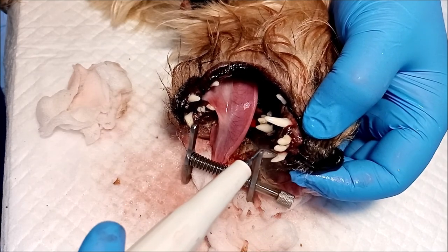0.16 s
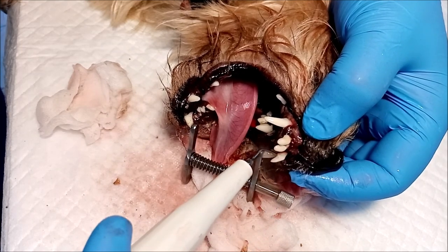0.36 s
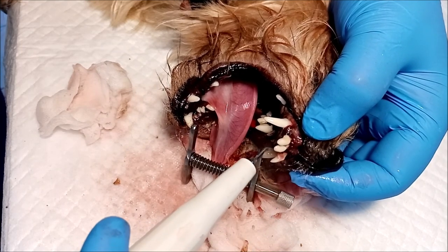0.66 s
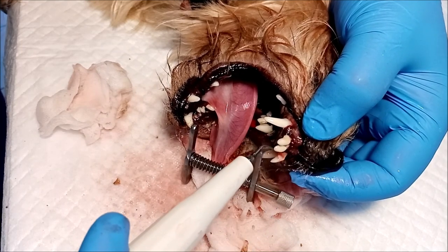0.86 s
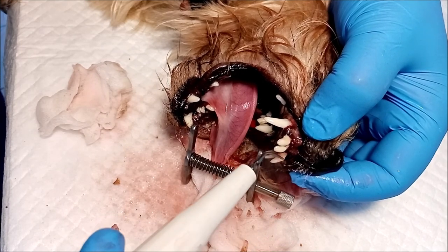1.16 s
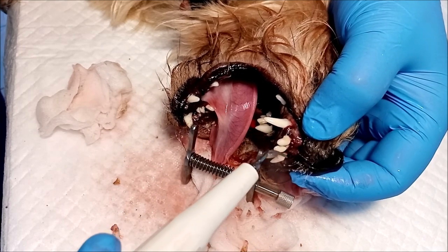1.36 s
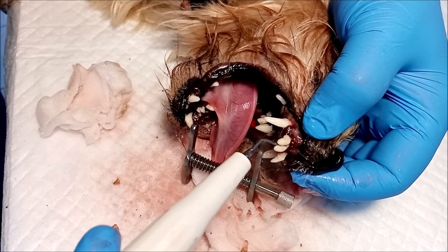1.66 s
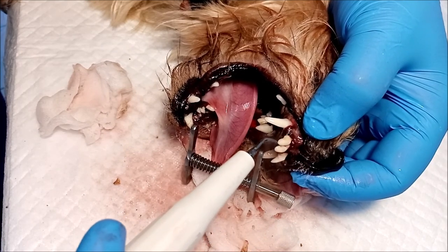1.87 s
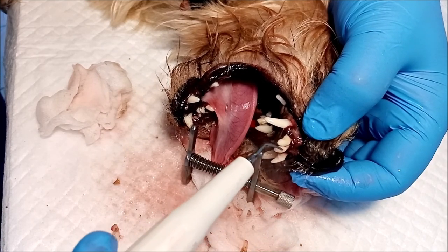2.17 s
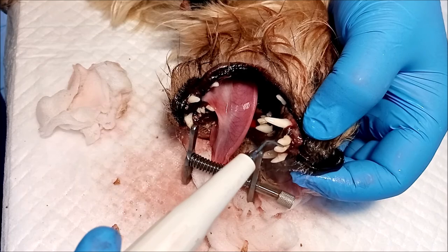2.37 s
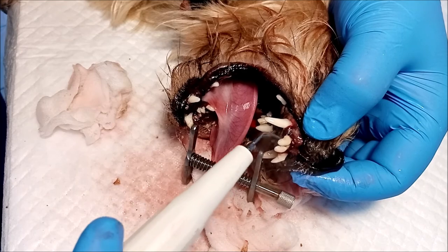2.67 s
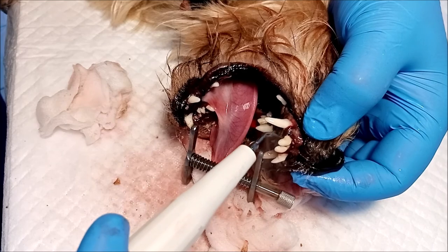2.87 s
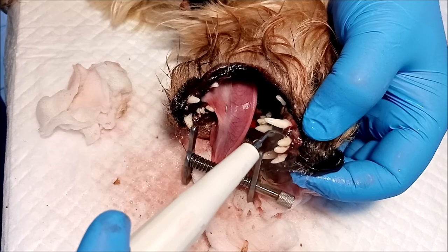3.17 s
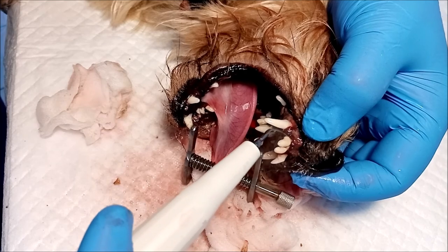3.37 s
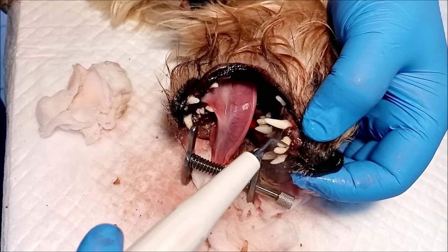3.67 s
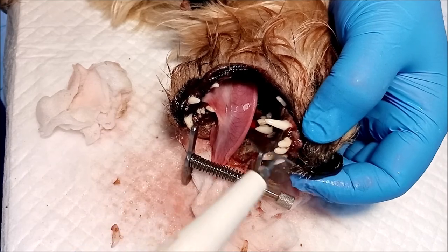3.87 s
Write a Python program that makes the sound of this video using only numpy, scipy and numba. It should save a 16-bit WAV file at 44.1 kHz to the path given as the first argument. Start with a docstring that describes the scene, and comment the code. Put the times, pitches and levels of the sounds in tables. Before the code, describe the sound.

A dental scaler squeals thin and rough near 8 kHz in uneven touches over scratchy crackle and water hiss, then stops suddenly with soft thuds and a puff.

```python
"""A rough squeal near 8 kHz over a scratchy hiss: an ultrasonic scaler works along wet teeth by two microphone ports.
The tip bounces unevenly on the enamel; its clustered impacts excite moving and fixed resonances.
Strong ultrasound overdrives each port on its own, heard as low crackle and lone pops.
Water spray hisses below as shaped noise; switching off gives soft thuds, a bright puff and a short hollow ring."""
import sys
import numpy as np
from scipy import signal
from scipy.fft import rfft, irfft, next_fast_len
from scipy.io import wavfile
from numba import njit

SR = 44100
rng = np.random.default_rng(int(sys.argv[2]) if len(sys.argv) > 2 else 0)


def inscribe(sig):
    """Save sig as 16-bit PCM at rate SR to the path in sys.argv[1].

    A 1-D sig is mono; a 2-D sig holds one channel per row.
    Samples are clipped to [-1, 1] before scaling.
    """
    pcm = np.round(np.clip(np.atleast_2d(sig).T, -1, 1) * 32767)
    wavfile.write(sys.argv[1], SR, pcm.astype(np.int16))


def boost_factor(decibels):
    """Convert a level in decibels to a linear amplitude factor."""
    exponent = np.asarray(decibels, float) / 20
    return 10 ** exponent


N = 177634
OFF_S = 3.865           # the tip has stopped
CONTROL_STEP = 32       # samples between values of a slow level curve


def rms_one(x):
    """Normalisation: each channel is scaled to unit effective value."""
    return x / np.sqrt(np.mean(x ** 2, axis=-1, keepdims=True) + 1e-20)


def in_time(rows):
    """Linear interpolation: each column of a table becomes a curve over time."""
    s, *columns = np.transpose(rows)
    return [np.interp(np.arange(N) / SR, s, c) for c in columns]


def colour(x, points):
    """Spectral weighting: dB curves over log frequency shape each channel; the mean power becomes 1."""
    hz, *columns = np.transpose(points)
    size = next_fast_len(N)
    log_hz = np.log(np.arange(size // 2 + 1) * SR / size + 1)
    gains = boost_factor([np.interp(log_hz, np.log(hz), c) for c in columns])
    out = irfft(rfft(x, size) * gains, size)[..., :N]
    return out / np.sqrt(np.mean(out ** 2))


def drift(rate, channels=1):
    """Low-pass random process: noise twice through a one-pole filter at rate [Hz], spread 1."""
    r = np.exp(-2 * np.pi * rate / SR)
    noise = rng.standard_normal((channels, N + 4000))
    slow = signal.lfilter([1], [1, -2 * r, r * r], noise)
    return rms_one(slow[:, 4000:])      # the filter's start is left out


def grains(per_s, spread_db, channels):
    """Shot noise: random clicks of either sign, their strengths in dB spread exponentially up to a limit."""
    strength_db = spread_db * np.minimum(rng.exponential(1, (channels, N)), 3)
    sizes = boost_factor(strength_db) * rng.choice([-1, 1], (channels, N))
    present = rng.random((channels, N)) < per_s / SR
    return rms_one(sizes * present + 1e-9)


def patchy(x, patchy_db, rate):
    """Independent band modulation: overlapping two-thirds-octave bands swell and sink, each by itself."""
    size = next_fast_len(N)
    octaves = np.log2(np.arange(size // 2 + 1) * SR / size / 100 + 1e-9).clip(0, 7)     # above 100 Hz
    band = octaves * 3 / 2
    spectrum = rfft(x, size)
    swell = boost_factor(patchy_db * drift(rate, channels=11))
    out = 0
    for k in range(11):
        weight = np.clip(1 - abs(band - k), 0, 1)
        out = out + swell[k] * irfft(spectrum * weight, size)[..., :N]
    return out


@njit
def resonate(x, turn, r):
    """Second-order resonance: its centre (radians per sample) may move; gain 1 on top."""
    y = np.zeros(len(x))
    for i in range(2, len(x)):
        y[i] = (1 - r * r) / 2 * (x[i] - x[i - 2]) + 2 * r * np.cos(turn[i]) * y[i - 1] - r * r * y[i - 2]
    return y


def mode(x, hz, width_hz):
    """Cascaded resonance: two equal stages, each width_hz wide, make steep skirts; rms 1."""
    turn, r = 2 * np.pi * hz / SR * np.ones(N), np.exp(-np.pi * width_hz / SR)
    return rms_one(resonate(resonate(x, turn, r), turn, r))


def at_ports(shared, own, alike):
    """Partial coherence: the right port gets the shared part later; each port adds a part of its own."""
    lag, alike = round(0.00077 * SR), np.clip(alike, 0, 1)      # lag of 0.77 ms
    common = np.array([shared, np.roll(shared, lag)])
    return np.sqrt(alike) * common + np.sqrt(1 - alike) * own


def split(level_db, pan_db):
    """Addition of incoherent powers: gains of two unrelated channels whose average has the given level."""
    left_share = 1 / (1 + boost_factor(-2 * pan_db))
    return 2 * boost_factor(level_db) * np.sqrt([left_share, 1 - left_share])


def held(rows, attack_s, release_s):
    """Exponential build-up and decay: power of each event, full from start to end; times are of amplitude."""
    t = np.arange(0, N + CONTROL_STEP, CONTROL_STEP) / SR
    start, length = np.transpose(rows)[:2, :, None]
    before, after = np.maximum(start - t, 0), np.maximum(t - start - length, 0)
    return np.exp(-2 * before / attack_s - 2 * after / release_s)


def every_sample(coarse):
    """Linear interpolation: a slow level curve is read at every sample."""
    return np.interp(np.arange(N) / CONTROL_STEP, np.arange(len(coarse)), coarse)


# spray colour at the ports: (frequency [Hz], left density [dB per Hz], right density [dB per Hz]), relative
SPRAY_COLOUR = [(39.5, 5.5, -32), (173, 5, 4), (1150, -3.5, -8.5), (2580, -5, -9), (4700, -2.5, -1.5),
                (6800, -9, -5), (8200, -3, 3.5), (9600, -16, -4.5), (12100, -5.5, -2.5), (13600, -9, -0.5),
                (15400, -4.5, -13)]
# spray flow before the fixed gains: (time [s], hiss level [dB], level of the rumble under 900 Hz [dB])
SPRAY_FLOW = [(0, -61.5, -65), (1, -61.5, -67), (2, -64, -80), (3, -60, -74), (3.88, -62, -63.5),
              (3.925, -64.5, -76), (3.965, -69, -88), (3.985, -72.5, -69), (4.03, -80, -65)]


def spray():
    """Turbulent flow noise: cooling water hisses as broadband noise; its rumble sinks first."""
    hiss_db, rumble_db = in_time(SPRAY_FLOW)
    noise = patchy(colour(rng.standard_normal((2, N)), SPRAY_COLOUR), patchy_db=3.0, rate=4.5)
    hiss = signal.sosfiltfilt(signal.butter(3, 900, "high", fs=SR, output="sos"), noise)
    rumble = signal.sosfiltfilt(signal.butter(3, 900, "low", fs=SR, output="sos"), noise)
    return boost_factor(hiss_db + 4.5) * hiss + boost_factor(rumble_db + 3.5) * rumble


# soft thuds of switching off: (time [s], level before shape and side gains [dB], frequency [Hz])
SWITCH_THUDS = [(3.826, -57, 170), (3.872, -54, 111), (3.894, -49.5, 174)]


def switch_off():
    """Damped oscillation and decaying noise: thuds of about one cycle, then a valve puff and its hollow ring."""
    puff_s, rise_s = 3.907, 0.0026
    puff_db, puff_t60_s = -46.5, 0.15
    ring_hz, ring_width_hz, ring_db, ring_t60_s = 1172, 800, -61, .5
    t, out = np.arange(N) / SR, np.zeros((2, N))
    for s, db, hz in SWITCH_THUDS:
        cycles = np.maximum(t - s, 0) * hz
        thud = 2.0 * np.sin(2 * np.pi * cycles) * np.exp(-1.8 * cycles)
        out += boost_factor(db) * thud * boost_factor([[3.0], [-4.0]])     # left, right
    since = np.maximum(t - puff_s, 0)
    rise = 1 - np.exp(-since / rise_s)
    noise = rng.standard_normal((2, N))
    bright = rms_one(signal.sosfilt(signal.butter(2, 6000, "high", fs=SR, output="sos"), noise))
    hollow = np.array([mode(mode(n, ring_hz, ring_width_hz), ring_hz, ring_width_hz) for n in noise])
    puff = boost_factor(puff_db - 60 * since / puff_t60_s) * bright
    ring = boost_factor(ring_db - 60 * since / ring_t60_s) * hollow
    return out + rise * (puff + ring)


# bursts of overdrive: (start [s], length [s], crackle level [dB], left-right balance [dB])
OVERDRIVE_BURSTS = [(0, 0.0045, -51, 23), (0.079, 0.071, -58, 18), (0.194, 0.023, -50, 27),
                    (0.332, 0.029, -51, 37), (0.436, 0.037, -46.5, 16), (0.487, 0.014, -48.5, 23),
                    (0.512, 0.042, -69, 18), (0.624, 0.03, -60, 27), (0.767, 0.017, -56.5, 28),
                    (1.038, 0.026, -52, 20), (1.211, 0.05, -50.5, 41), (1.599, 0.033, -55, 15),
                    (1.702, 0.03, -63.5, 2), (1.887, 0.094, -49, 13), (1.992, 0.078, -47, 20),
                    (2.098, 0.014, -54, 18), (2.213, 0.0096, -57, 6), (2.389, 0.13, -48, 20),
                    (2.632, 0.029, -54, 16), (2.717, 0.07, -58.5, 2), (2.843, 0.11, -52, 5.5),
                    (2.988, 0.025, -56.5, 9), (3.125, 0.052, -49.5, 21), (3.318, 0.028, -55, 25),
                    (3.377, 0.053, -55.5, 5.5), (3.448, 0.03, -45, 22), (3.647, 0.011, -58, 18),
                    (3.75, 0.052, -57, 15)]
# faint crackle under the bursts: (time [s], level [dB], left-right balance [dB])
FAINT_BED = [(0, -76, 10), (.3, -67.5, 15), (.6, -57.5, 27), (.85, -70.5, 0), (1.15, -63.5, 28),
             (1.5, -65, -13), (1.8, -66, -6.5), (2.2, -64.5, 5), (2.6, -63.5, 10), (2.8, -57.5, -11.5),
             (3.25, -64, 21), (3.55, -61, 28), (3.85, -68, 18)]


def overdrive():
    """Addition of powers: level and left-right balance in dB of crackle bursts over a faint bed."""
    _, _, burst_db, burst_pan = np.transpose(OVERDRIVE_BURSTS)[:, :, None]
    faint_db, faint_pan = in_time(FAINT_BED)
    bursts = boost_factor(2 * burst_db) * held(OVERDRIVE_BURSTS, attack_s=0.0084, release_s=0.0085)
    faint = boost_factor(2 * faint_db)
    power = every_sample(bursts.sum(axis=0)) + faint
    pan_db = (every_sample((bursts * burst_pan).sum(axis=0)) + faint * faint_pan) / power
    return 10 * np.log10(power), pan_db


# crackle colour at the ports: (frequency [Hz], left density [dB per Hz], right density [dB per Hz]), relative
CRACKLE_COLOUR = [(30, -24, -32), (60.5, -10, -22), (118, -1.5, 2), (197, -0.5, -3), (596, -2.5, -0.5),
                  (1650, -8.5, -1.5), (2880, -13, -4.5), (6800, -15, -8), (10400, -18, -18),
                  (15200, -31, -43)]
# weight of the crackle's bass: (time [s], gain [dB])
BASS_WEIGHT = [(0, 0), (1, 5), (2, 4), (2.5, 1.5), (3.0, -3), (3.8, -2.5)]


def crackle(clumps, level_db, pan_db):
    """Overload: each port pops by itself, partly in step with the impacts, until the tip stops."""
    bass_hz, stop_s = 201, 0.03
    running = np.clip((OFF_S - np.arange(N) / SR) / stop_s, 0, 1)
    pops = grains(3000, spread_db=4.5, channels=2) * clumps ** 0.24 * boost_factor(3.1 * drift(45, channels=2))
    pops = patchy(colour(rms_one(pops), CRACKLE_COLOUR), patchy_db=2.0, rate=17.0)
    bass = signal.sosfiltfilt(signal.butter(2, bass_hz, fs=SR, output="sos"), pops)
    weighted = pops + (boost_factor(in_time(BASS_WEIGHT)[0]) - 1) * bass
    return running * split(level_db, pan_db) * weighted


# lone pops at the left port: (time [s], starting level [dB], time scale [ms])
LEFT_POPS = [(.367, -34, 0.56), (1.938, -30, 0.84), (2.017, -38, 0.4), (2.099, -29.5, 1.03),
             (2.422, -34, 0.68), (2.493, -24.5, 0.23), (2.522, -29, 0.94)]


def lone_pops():
    """Step response of an overloaded port: the strongest overdrive jumps suddenly and swings back."""
    t, left = np.arange(N) / SR, np.zeros(N)
    for s, db, ms in LEFT_POPS:
        lengths = np.maximum(t - s, 0) * 1000 / ms
        left += boost_factor(db) * (t >= s) * np.cos(2.0 * lengths) * np.exp(-.7 * lengths)
    return np.array([left, 0 * left])


# touches of the tip on the tooth, levels while held:
# (start [s], length [s], squeal level [dB], squeal pitch [Hz], squeal left-right balance [dB], scratch level [dB])
TIP_TOUCHES = [(0.0, 0.037, -50, 8130, 6, -65.5), (0.058, 0.12, -51, 8100, 3.5, -55.5),
               (0.182, 0.054, -52.5, 8070, -3, -53.5), (0.257, 0.06, -60, 8500, -20, -62),
               (0.332, 0.042, -55, 8630, -7, -50), (0.397, 0.075, -52.5, 8870, -8, -55),
               (0.484, 0.013, -51, 8370, -3, -51.5), (0.588, 0.012, -61, 8500, -18, -62.5),
               (0.618, 0.047, -54.5, 8720, -2, -58), (0.691, 0.078, -63.5, 8850, -2, -57),
               (1.051, 0.027, -47, 8370, 2, -54), (1.213, 0.056, -55, 8500, -5, -54),
               (1.283, 0.026, -63, 8650, -15, -60.5), (1.441, 0.14, -47.5, 8600, 6.5, -57),
               (1.595, 0.042, -50.5, 8360, 3, -53), (1.655, 0.028, -59, 8200, -11, -79),
               (1.692, 0.064, -45, 8270, 8.5, -56), (1.765, 0.11, -48.5, 8300, 6, -56.5),
               (1.921, 0.047, -49, 8580, 3, -50.5), (1.994, 0.12, -50.5, 8450, 2.5, -55),
               (2.212, 0.0067, -57, 8250, 9, -53), (2.286, 0.051, -47, 7900, 9, -56),
               (2.354, 0.027, -47.5, 8220, 2, -55), (2.389, 0.15, -54, 8200, -1, -54.5),
               (2.548, 0.052, -60, 8000, -20, -68), (2.635, 0.028, -59, 8590, -14, -53.5),
               (2.686, 0.028, -49.5, 8560, 6, -55), (2.723, 0.073, -46, 8240, 4, -54.5),
               (2.81, 0.13, -52.5, 8180, -1, -53), (2.953, 0.023, -66, 8060, -4, -54),
               (2.982, 0.036, -51.5, 8550, -5, -53.5), (3.115, 0.064, -49.5, 8700, -5, -52),
               (3.188, 0.13, -54.5, 8520, -20, -59), (3.31, 0.038, -56.5, 8800, -22, -54.5),
               (3.367, 0.068, -59, 9300, -12, -61.5), (3.44, 0.052, -48.5, 8000, -2, -56),
               (3.496, 0.1, -56.5, 8750, -27, -58.5), (3.607, 0.069, -55, 9120, -25, -56.5),
               (3.699, 0.068, -55.5, 9010, -23, -60), (3.778, 0.013, -51, 8200, -11, -55.5)]


def touching():
    """Energy balance of contact: squeal, scratch and sizzle levels; the strongest touch rules pitch and side."""
    attack_s, release_s = .003, 0.01
    landing_db, landing_s = -4.5, 0.0075            # an extra burst on landing, against the held level
    # the wet film is felt a moment before landing and keeps a weak contact after lifting
    approach_s, linger_s, linger_db, scratch_linger_db = .012, 0.078, -17, -21.5
    linger_turn_db = -14                            # the lingering squeal leans further right
    free_squeal_db, free_squeal_hz, free_pan_db, free_scratch_db = -76, 8300, 8, -79    # the tip running free
    sizzle_from_squeal_db, sizzle_from_scratch_db = -11, -9.5

    _, _, squeal_db, hz, pan_db, scratch_db = np.transpose(TIP_TOUCHES)[:, :, None]
    film = held(TIP_TOUCHES, approach_s, linger_s)
    landings = held([(row[0], 0) for row in TIP_TOUCHES], attack_s, landing_s)
    firm = held(TIP_TOUCHES, attack_s, release_s) + boost_factor(2 * landing_db) * landings
    time_left = OFF_S - np.arange(len(firm[0])) * CONTROL_STEP / SR
    running = np.clip(time_left / 0.026, 1e-3, 1) ** 2

    ringing = boost_factor(2 * squeal_db) * firm
    lingering = boost_factor(2 * (squeal_db + linger_db)) * film
    free = boost_factor(2 * free_squeal_db)
    squealing = (ringing + lingering).sum(axis=0) + free
    # pitch and side are means weighted by power
    pitch = (((ringing + lingering) * hz).sum(axis=0) + free * free_squeal_hz) / squealing
    turned = ringing * pan_db + lingering * (pan_db + linger_turn_db)
    side = (turned.sum(axis=0) + free * free_pan_db) / squealing
    rasping = (boost_factor(2 * scratch_db) * (firm + boost_factor(2 * scratch_linger_db) * film)).sum(axis=0)
    rasping = rasping + boost_factor(2 * free_scratch_db)
    sizzling = boost_factor(2 * sizzle_from_squeal_db) * squealing + boost_factor(2 * sizzle_from_scratch_db) * rasping
    levels = [every_sample(10 * np.log10(p * running)) for p in (squealing, rasping, sizzling)]
    return levels + [every_sample(pitch), every_sample(side)]


def bouncing():
    """Impact excitation: tip impacts come in clumps a few ms long; rows: shared, left, right."""
    clumps = boost_factor(2.3 * drift(110))
    return clumps, clumps * grains(12000, spread_db=-1.0, channels=3)


# sizzle colour at the ports: (frequency [Hz], left density [dB per Hz], right density [dB per Hz]), relative
SIZZLE_COLOUR = [(8500, -51, -63), (9600, -15, 8.5), (12200, -4, 0.5), (12800, 3, 0.5), (14650, -1.5, 7),
                 (15200, -2, -3), (15900, -30, -13)]
# sizzle against its share of squeal and scratch: (time [s], gain [dB], left-right balance [dB])
SIZZLE_BALANCE = [(0, -0.5, 2), (.15, 2, 1), (.5, -0.5, 0.5), (.9, 5.5, 1), (1.3, -2, 1.5), (1.55, -1.5, 1),
                  (1.8, 3, -1), (2.1, 1.5, 1), (2.4, 0.5, 0.5), (2.9, -3.5, -1), (3.15, -1, -1),
                  (3.4, 0.5, 1.5), (3.7, 3.5, 3), (3.8, -6, 0)]


def sizzle(impacts, level_db, squeal_pan):
    """Broadband spectrum of short impacts: their sharpest edge, leaning partly with the squeal."""
    trim_db, trim_pan = in_time(SIZZLE_BALANCE)
    ports = at_ports(impacts[0], impacts[1:], alike=0.076)
    return split(level_db + trim_db, trim_pan + 0.71 * squeal_pan) * colour(ports, SIZZLE_COLOUR)


# scratch colour: (frequency [Hz], density [dB per Hz]), relative
SCRATCH_COLOUR = [(1500, -6.5), (2600, -3), (4000, 0.5), (5500, 1.5), (7000, -2), (9000, 1.5),
                  (11000, -22.5)]
# rough whistle in the scratch, before flutter:
# (time [s], pitch [Hz], level against the rasp [dB], left-right balance [dB])
ROUGH_WHISTLE = [(0, 4180, -9, -15), (.5, 4200, -12, -14), (.62, 4360, -4.5, 12), (1.08, 4350, -5.5, 3),
                 (1.27, 4130, -8, 10), (1.4, 4100, -25, -6), (1.95, 3560, -11, -6), (2.22, 3850, -8, -1),
                 (2.77, 4140, -8.5, -10), (2.86, 3420, -12.5, -6), (3.12, 3500, -9.5, -3),
                 (3.2, 4000, -2, 8), (3.26, 3240, 0, 23), (3.33, 4870, -14, 7), (3.52, 3950, -4, 3),
                 (3.6, 3480, -23, 16), (3.66, 4280, 0.5, 14), (3.72, 3660, -25, 0), (3.79, 2940, 1, 7),
                 (3.85, 3100, -22, 0)]


def scratch(impacts, level_db, pan_db):
    """Friction noise and subharmonic: a broad rasp; a whistle near half the squeal, as if bounces were missed."""
    hz, whistle_db, whistle_pan = in_time(ROUGH_WHISTLE)
    ports = at_ports(impacts[0], impacts[1:], alike=0.065)
    fluttering = hz + 150 * drift(38)[0]
    whistle = [mode(p, fluttering, width_hz=650) for p in ports]
    rasp = patchy(colour(ports, SCRATCH_COLOUR), patchy_db=2.0, rate=4.1)
    whistle_level_db = level_db + whistle_db + 0.82 * drift(26)[0]
    return split(level_db, pan_db) * rasp + split(whistle_level_db, whistle_pan) * whistle


# fixed modes of tip and tooth, levels before swell and gain:
# (frequency [Hz], width of each stage [Hz], left level [dB], right level [dB])
TIP_MODES = [(7600, 200, -8, -11), (7900, 200, -9, -10), (8300, 250, -6, -6), (8600, 200, -9, -8),
             (9150, 300, -16, -10), (9600, 400, -22, -14), (10100, 500, -26, -17)]


def squeal(impacts, level_db, hz, pan_db):
    """Resonance: impacts ring a mode that moves and flutters; fixed modes near it join, each swelling by itself."""
    ports = at_ports(impacts[0], impacts[1:], alike=0.9)
    fluttering = hz + 170 * drift(22)[0]
    out = np.array([mode(p, fluttering, width_hz=730) for p in ports])
    for tip_hz, width_hz, *side_db in TIP_MODES:
        distance_khz = abs(tip_hz - hz) / 1000
        swell = boost_factor(4.5 * drift(21.0)[0] - 10.0 * distance_khz)
        out += [boost_factor(db + 3.0) * swell * mode(p, tip_hz, width_hz) for p, db in zip(ports, side_db)]
    return split(level_db, pan_db) * rms_one(out)


def scene():
    """Superposition: the sounds of tip, ports, water and switch add up."""
    squeal_db, scratch_db, sizzle_db, hz, squeal_pan = touching()
    crackle_db, crackle_pan = overdrive()
    clumps, impacts = bouncing()
    tip = squeal(impacts, squeal_db, hz, squeal_pan)
    tip += scratch(impacts, scratch_db, 0.39 * crackle_pan)     # leans the same way as the crackle
    tip += sizzle(impacts, sizzle_db, squeal_pan)
    return tip + crackle(clumps, crackle_db, crackle_pan) + lone_pops() + spray() + switch_off()


def top_cut(x):
    """Nothing passes above the cut-off."""
    return signal.sosfilt(signal.butter(12, 15810, fs=SR, output="sos"), x)


def record(dry):
    """Band limitation: filters cut the deep bass and the top."""
    dry = signal.sosfilt(signal.butter(2, 65, "high", fs=SR, output="sos"), dry)
    mix = signal.sosfilt(signal.cheby2(12, 50, 15900, fs=SR, output="sos"), dry)     # 50 dB down at 15900 Hz
    return top_cut(mix)


dry = scene()
out = record(dry)
inscribe(out)
```